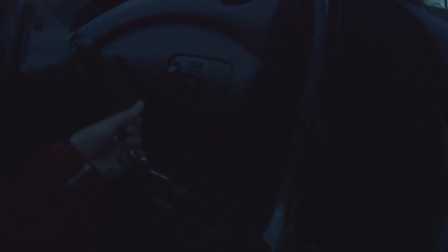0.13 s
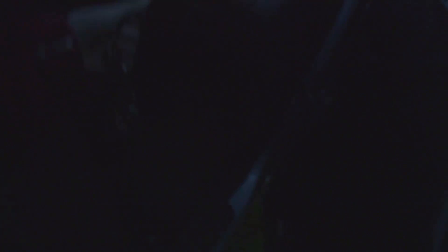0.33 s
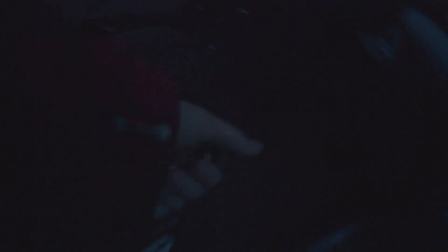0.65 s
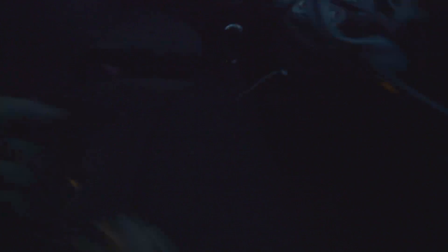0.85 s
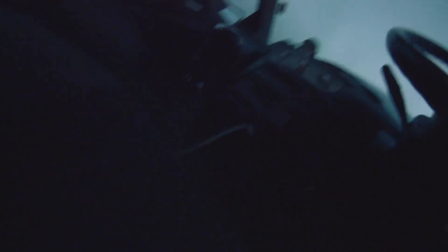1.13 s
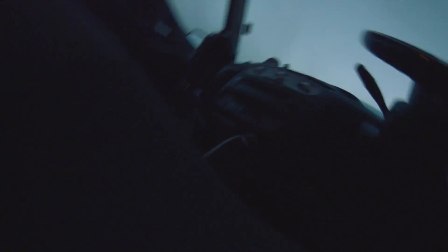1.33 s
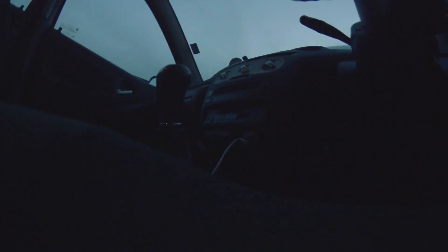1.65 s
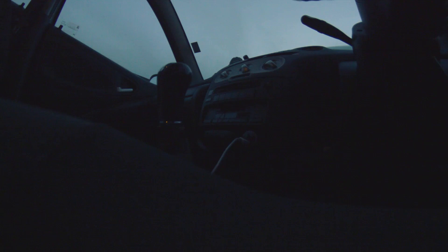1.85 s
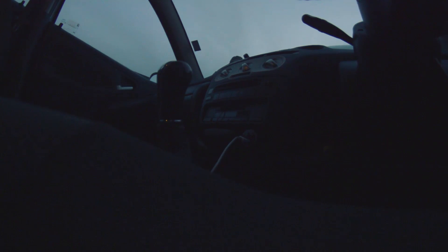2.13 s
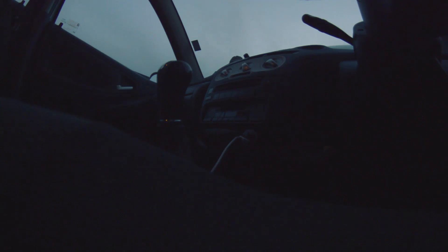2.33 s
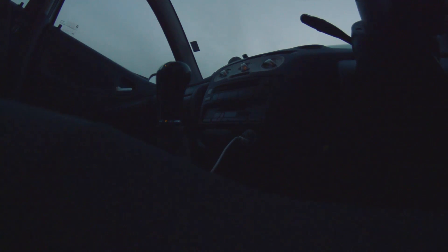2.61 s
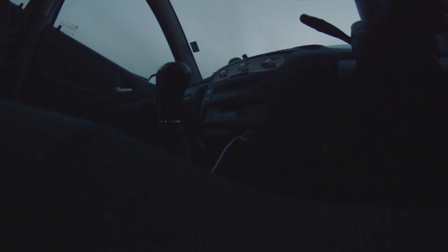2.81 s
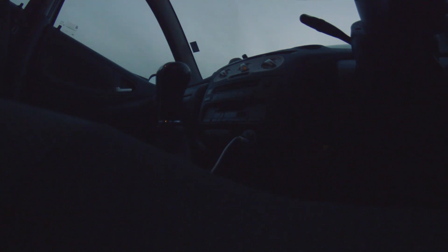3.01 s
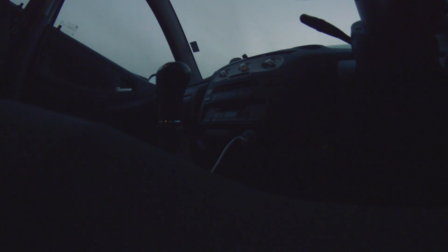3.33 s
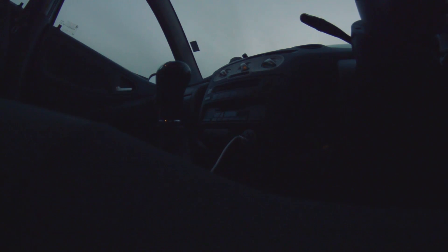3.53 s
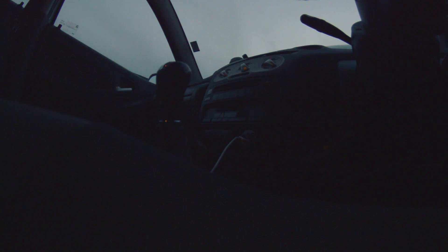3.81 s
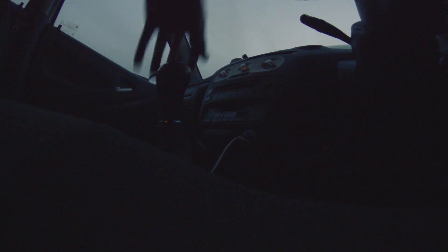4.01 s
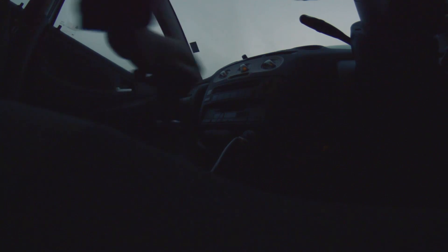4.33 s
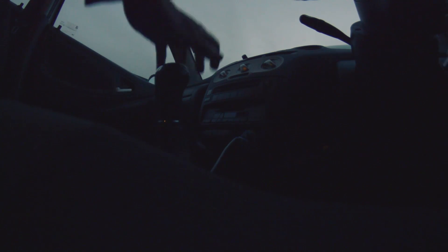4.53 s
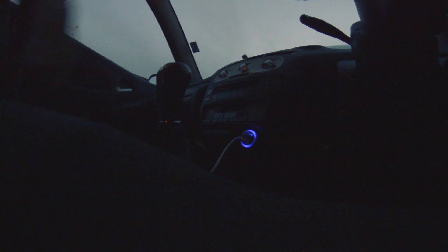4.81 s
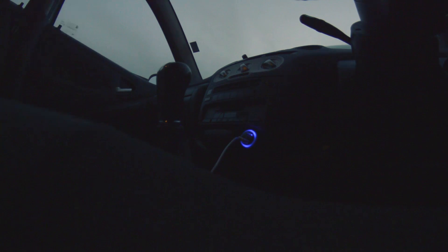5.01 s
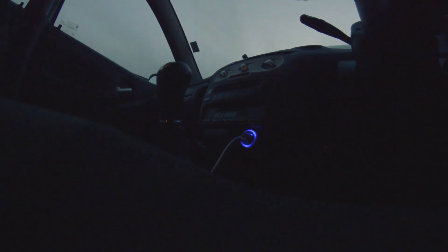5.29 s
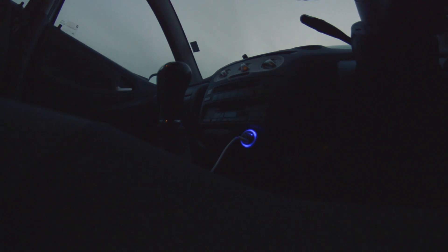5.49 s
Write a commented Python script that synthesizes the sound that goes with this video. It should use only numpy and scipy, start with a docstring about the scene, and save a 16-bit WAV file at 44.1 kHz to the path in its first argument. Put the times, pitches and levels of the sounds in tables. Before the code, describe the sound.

Close handheld camera in a dry, padded car interior, mono: low idling engine throb beneath, keys ticking and ringing in irregular bursts. Cloth rustles, then heavy low bumps and a hard tap as the camera is put down. After a quieter gap come plastic lock clacks with gritty scraping, a dull hand rub, more clacks, a brief motor buzz and two small latch drops amid clinks, then sparse fading jingles.

```python
"""Keys jangling in an idling car

A bunch of keys jangles at the ignition lock: each clink is a noisy tick plus ringing tones.
The lock clacks and scrapes as short noise, a hand rubs and bumps the camera, and a small actuator
buzzes with pulses until its latch drops twice. Engine beats and cabin noise run underneath.
The camera turns its gain down on loud sounds."""
import sys
import numpy as np
from scipy import signal
from scipy.fft import rfft, irfft, next_fast_len
from scipy.io import wavfile
from scipy.ndimage import map_coordinates

SR = 44100
rng = np.random.default_rng(int(sys.argv[2]) if len(sys.argv) > 2 else 0)


def file_out(sig):
    """Save sig as 16-bit WAV at sys.argv[1]."""
    # one column per channel
    cols = np.atleast_2d(sig).T
    # limit, then scale
    lim = np.clip(cols, -1, 1)
    pcm = np.round(lim * 32767).astype(np.int16)
    wavfile.write(sys.argv[1], SR, pcm)


N = 249606

# In the tables, tone colours and shares of modes are relative levels; t60 is the time to fall 60 dB.
# Engine speed: (time [s], engine cycles per second [Hz])
IDLE = [(0.0, 28.55), (0.66, 28.88), (5.66, 28.71)]
# Engine tones: (multiple of the cycle rate, relative level before random drift [dB])
ORDER = [(1, -23), (2, 1), (3, -33.5), (4, -8), (5, -6.5), (6, -51), (7, -8), (8, -14), (9, -28.5),
         (10, -34.5)]
# Colour of engine and fan noise in the cabin: (frequency [Hz], level per Hz [dB])
CABIN = [(12, -44), (38, -15), (60, 1.5), (204, -8), (285, -12.5), (624, -15), (802, -17), (1120, -20),
         (2080, -24), (3530, -36.5), (6180, -40), (16000, -50)]
# Cabin noise before it throbs: (time [s], level [dB])
CABIN_LEVEL = [(0, -20), (.85, -29), (2.3, -30), (3, -30.5), (4, -30.5), (5.66, -30.5)]
# Key on key: (time [s], tick level [dB], ring level before random changes [dB], kind of contact)
CLINKS = [(.069, -9.5, -22, "long"), (.088, -6, -21, "tag"), (0.0978, -7, -8.5, "bunch"),
          (0.109, -15, -5.5, "fob"), (0.194, -10.5, -32, "fob"), (0.2445, -8.5, -28, "long"),
          (0.327, -5, -0.5, "long"), (0.3568, 0.5, -40, "short"), (0.402, -13, -14, "pair"),
          (0.5902, -2.5, -7.5, "tag"), (0.624, -5, -36, "short"), (.6464, -8, -10, "short"),
          (.6824, -4, -18, "pair"), (.7176, -20, -20, "bunch"), (0.736, -10, -15.5, "fob"),
          (0.761, -9.5, -20, "fob"), (0.7733, -12, -4.5, "bunch"), (.7842, -5, -9.5, "fob"),
          (0.8015, -16, -12, "bunch"), (.851, -21, -21, "long"), (0.886, -10, -11, "short"),
          (0.94, -11, -21.5, "fob"), (1, -7, -32, "pair"), (1.0132, -2.5, -5, "pair"),
          (1.023, -25, -15, "fob"), (1.052, -12, -23, "fob"), (1.088, -11, -21.5, "short"),
          (1.12, -12.5, -19, "short"), (1.2011, -11, -26.5, "bunch"), (1.216, -11, -16, "short"),
          (1.257, -8, -38, "tag"), (1.2823, -12, -30, "short"), (1.374, -7.5, -39, "short"),
          (1.4545, -.5, -5, "pair"), (1.5424, -15, -19, "long"), (1.59, -7.5, -31, "pair"),
          (1.631, -12, -35, "pair"), (1.681, -18, -27.5, "long"), (1.803, -5.5, -16, "long"),
          (1.827, -29, -8, "long"), (1.8816, -9, -25, "tag"), (1.9372, -12, -11, "tag"),
          (1.9609, -1, -15.5, "long"), (2.0385, -9, -23, "fob"), (2.0577, -8, -10.5, "fob"),
          (2.107, -7, -22, "pair"), (2.136, -7, -8.5, "pair"), (2.195, -18, -13, "fob"),
          (2.259, -32, -30, "fob"), (2.3073, -6.5, -27, "fob"), (2.396, -13, -9, "tag"),
          (2.4653, -17, -21.5, "pair"), (2.489, -20, -21, "long"), (2.51, -13, -20, "pair"),
          (2.5893, -15, -44, "short"), (2.7066, -32, -37, "long"), (2.81, -24.5, -31.5, "pair"),
          (3.086, -23, -31, "pair"), (3.151, -8, -31, "short"), (3.3154, -18, -28, "pair"),
          (3.348, -11, -21, "fob"), (3.3788, -4, -17, "short"), (3.467, -18, -20.5, "fob"),
          (3.5969, -6, -10, "short"), (3.638, -17, -16, "short"), (3.721, -14, -23.5, "fob"),
          (3.7798, -10, -15, "long"), (3.7893, -13, -6.5, "pair"), (3.8147, -18, -16, "fob"),
          (3.8374, -18, -20.5, "long"), (3.901, -35, -25, "tag"), (3.9564, -13, -17, "pair"),
          (4.0083, -16, -15.5, "pair"), (4.054, -14, -21.5, "pair"), (4.2477, -23, -29.5, "pair"),
          (4.653, -21, -24, "bunch"), (4.7571, -36, -19, "long"), (4.8176, -7.5, -15.5, "bunch"),
          (4.8548, -2, -10.5, "bunch"), (4.916, -3, -9, "pair"), (4.9725, -2.5, -7, "bunch"),
          (5.013, -19, -27, "short"), (5.0717, -8.5, -23.5, "pair"), (5.1424, -13, -8.5, "short"),
          (5.1694, -28, -27, "pair"), (5.2045, -25, -23, "pair"), (5.243, -25, -25, "pair"),
          (5.3179, -21.5, -30, "short"), (5.451, -23, -55, "short"), (5.5197, -15.5, -19.5, "pair"),
          (5.5553, -25, -23.5, "pair"), (5.585, -24, -28, "pair"), (5.613, -26, -27, "long")]
# How each contact shares its ring: kind: (middle [dB], fob [dB], high [dB], top [dB])
CONTACT = {"long": (0, -20, -11, -21), "short": (-6.5, -22, 0, -19), "pair": (-0.5, -15, -3, -15),
           "fob": (-12.5, -1.5, -5.5, -14), "bunch": (-1.5, -5, -5.5, -9), "tag": (-3, -20, -2, -5)}
# Low modes of the long keys: name: (frequency [Hz], t60 when fully free [s])
LOW_RING = {"a": (3480, 0.18), "b": (4204, 0.33), "c": (4409, .4), "d": (5491, .2), "e": (6430, 0.048),
            "f": (6000, 0.1), "g": (7930, 0.073)}
# Five families of key modes, the last from split rings and tags:
# (frequency [Hz], relative level before scatter [dB], t60 when fully free [s])
MIDDLE_RING = [(8460, -12, .1), (8620, -14, .1), (8710, 0, .085), (8790, -9, .1)]
FOB_RING = [(9500, -14, .05), (10420, -10, .08), (10670, 0, .07), (10950, -7, .06)]
HIGH_RING = [(12560, 0, .06), (12890, -3, .06), (13620, -7, .065)]
TOP_RING = [(15055, 0, .13), (15270, 0, .1)]
SMALL_RING = [(5020, 0, .06), (5491, 0, .1), (6010, 0, .07), (6690, 0, .08), (7220, -2, .06),
              (7930, -2, .07)]
# A long key hangs free and rings low: (time [s], level before sway [dB], names of its low modes)
NOTES = [(0.095, -19.5, "bc"), (.81, -15, "e"), (0.828, -28.5, "b"), (1.02, -9, "e"), (1.258, -14.5, "e"),
         (1.281, -23, "e"), (1.458, -26, "bc"), (1.543, -29.5, "cb"), (1.802, -27.5, "cb"),
         (1.828, -20, "e"), (1.915, -23, "e"), (2.145, -28, "b"), (2.19, -25, "f"), (2.397, -23, "cb"),
         (3.18, -46, "c"), (3.64, -35, "c"), (3.781, -17, "cd"), (3.815, -18, "e"), (3.955, -39, "cb"),
         (4.054, -37, "c"), (4.862, -9.5, "e"), (4.916, -15, "g"), (4.917, -28.5, "ab"),
         (4.995, -28.5, "cb"), (5.143, -36.5, "c"), (5.243, -30, "e"), (5.263, -42, "cb"),
         (5.519, -29.5, "bc")]
# Colour of metal ticks: (frequency [Hz], level per Hz [dB])
TICK = [(1500, -1.5), (3000, -1.5), (5000, 2.5), (8500, 3.5), (12000, -3.5), (16000, -10)]
# How hard the bunch is stirred: (time [s], gain [dB])
RATTLE = [(0, -50), (.24, -38.5), (.45, -45), (.76, -26.5), (.88, -34), (1.5, -36), (1.81, -54.5),
          (1.88, -31.5), (2.02, -25), (2.57, -39.5), (2.81, -49.5), (3.1, -51), (3.72, -40), (4.03, -40),
          (4.59, -52.5), (4.73, -35.5), (4.98, -42), (5.28, -47.5), (5.66, -55)]
# Lock barrel: (time [s], body level [dB], treble level against the body [dB], t60 [s])
CLACKS = [(0.001, -7.5, -14, 0.058), (0.403, -8, 0.5, 0.023), (3.044, -10, -11, 0.042),
          (3.127, -18, -5, 0.037), (3.154, -15.5, -34, 0.052), (3.206, -17, -12, 0.055),
          (3.316, -19.5, -24, 0.063), (3.349, -9.5, -10, 0.063), (3.401, -1.5, 1.5, 0.018),
          (3.428, -12, -25, 0.022), (4.172, -24, -34, 0.06), (4.386, -13.5, -15, 0.025),
          (4.507, -5.5, -22, 0.042), (4.528, -15, -13, 0.067), (4.567, -5.5, 1, 0.033),
          (4.584, -18, 7, 0.047), (4.61, -18.5, 5, 0.034), (4.622, -13.5, 14.5, 0.038)]
# Colour of the steering-column plastic: (frequency [Hz], level per Hz [dB])
BARREL = [(120, -66), (200, -1), (670, 6.5), (1220, 0), (1530, -1), (2060, -5.5), (2380, -9), (2990, -10.5),
          (4030, -9), (4510, -12.5), (6000, -15.5), (7800, -21), (13200, -120)]
# Hollow notes of the column shroud: (frequency [Hz], width [Hz], relative level [dB])
COLUMN = [(713, 146, 0), (1454, 170, 2), (2320, 300, -2.5)]
# Key blade over the tumblers: (peak time [s], peak before judder and mixing [dB], t60 [s])
SCRAPE = [(3.13, -30, 0.24), (3.33, -18, 0.56), (4.6, -24.5, 0.22)]
# Soft bumps on the camera body: (time [s], level [dB], swing frequency [Hz])
BUMPS = [(0.822, -2.5, 228), (.901, 0, 253), (.959, 1.5, 192), (1.302, 3.5, 73), (1.335, 4, 37.4),
         (1.365, 8.5, 97), (1.385, 13.5, 55), (1.413, 24.5, 94.5), (1.455, 16.5, 83.5), (1.586, 14.5, 63.3),
         (1.626, 9.5, 83.4), (2.024, -1.5, 213), (2.049, 2.5, 221), (2.518, 1.5, 194), (2.535, 5.5, 39),
         (2.595, 9, 48.6), (4.304, 8, 240), (4.327, 7, 124), (4.374, 3, 65)]
# The camera meets the seat frame: (time [s], level [dB])
TAPS = [(1.7456, 2), (1.754, 9)]
# Palm strokes over the trim: (peak time [s], peak level before flutter [dB])
RUB = [(4.18, -12.5), (4.215, -22.5), (4.275, -28.5), (4.316, -11.5), (4.39, -19), (4.42, -23)]
# Colour of the palm: (frequency [Hz], level per Hz [dB])
PALM = [(35, -28), (60, -10), (85, -9), (123, -6.5), (185, -11), (330, -4.5), (445, -11), (4000, -41.5),
        (5200, -44), (8800, -120)]
# Cloth rustling as the camera is carried: (time [s], level before flutter [dB])
SLEEVE = [(0.0, -25.5), (0.6, -30), (0.85, -42)]
# Colour of the cloth: (frequency [Hz], level per Hz [dB])
CLOTH = [(150, -38), (250, -25), (429, -24), (480, -1.5), (605, -6), (1010, -9.5), (3500, -28.5),
         (4550, -41), (7700, -120)]
# Actuator housing, passed twice: (frequency [Hz], width for one pass [Hz], level for one pass [dB])
HOUSING = [(540, 250, -0.5), (1470, 310, -3), (2280, 180, 1), (2850, 310, -2.5)]
# Latch drops: (time [s], level [dB])
LATCH = [(4.972, -19), (5.075, -24)]
# Latch modes: (frequency [Hz], relative level before scatter [dB], t60 [s])
LATCH_RING = [(496, -1, 0.14), (1036, -4.5, .05), (2050, -2, 0.069), (2660, -13, .04)]

SECOND_FIRING = 0.413  # share of the cycle at which the second exhaust beat comes
BEATS_DB = -22.5  # level of the exhaust beats
SECOND_MODE_DB = -3  # second named low mode against the first, before scatter
SMALL_DB = -18  # small rings against the ring of each clink
SCRAPE_RISE_S = 0.048
BUMP_T60_S, BUMP_CYCLES = 0.04, 2.2  # decay: a fixed part plus some cycles of the swing
PUFF_DB = -32.5  # rustle of the grip against each bump
RUB_RISE_S, RUB_T60_S = 0.15, 0.18
SCUFF_S, SCUFF_DB = 1.083, -21.5  # a short squeaky scuff
SCUFF_HZ, SCUFF_WIDTH_HZ = 1350, 500  # its resonance, passed twice; width is for one pass
BUZZ_PEAK_S, BUZZ_DB = 4.88, -27.5  # actuator
BUZZ_RISE_S, BUZZ_HOLD_S, BUZZ_T60_S = 0.42, 0.035, 0.1
BUZZ_HZ, BUZZ_SAG_HZ_PER_S = 182, 35  # speed at the peak, and its fall under load
TOP_HZ = 15900  # upper band limit


def amp(db):
    """Turns decibels into a plain gain."""
    return 10 ** (np.asarray(db) / 20)


def unit(x):
    """Scales a sound to an RMS (average strength) of one."""
    return x / np.sqrt(np.mean(x ** 2) + 1e-20)


def curves(rows, outside=None):
    """One value per sample for each column after the time."""
    s, *columns = np.transpose(rows)
    return [np.interp(np.arange(N) / SR, s, column, outside, outside) for column in columns]


def wobble(rate):
    """A smooth random curve through rate random points a second."""
    points = rng.standard_normal(int(N * rate / SR) + 4)
    return map_coordinates(points, [np.arange(N) * rate / SR])


def swell(peak_s, db, rise_s, t60, hold_s=0):
    """Gain that climbs 60 dB in rise_s, holds, then falls 60 dB in t60."""
    t = np.arange(N) / SR - peak_s
    climb_db = 60 * np.minimum(t, 0) / rise_s
    fall_db = 60 * np.maximum(t - hold_s, 0) / t60
    return amp(db + climb_db - fall_db)


def filtered(x, response):
    """Multiplies the spectrum of x by a response to frequency."""
    m = next_fast_len(N + SR // 2)
    return irfft(rfft(x, m) * response(np.fft.rfftfreq(m, 1 / SR)), m)[:N]


def colour(points):
    """Gain drawn through (frequency [Hz], level [dB]) points on a log axis."""
    f, db = np.transpose(points)
    return lambda hz: amp(np.interp(np.log(hz + 1), np.log(f + 1), db))


def resonant(peaks):
    """Response of hollow bodies that favour the notes (frequency [Hz], width [Hz], level [dB])."""
    def response(f):
        total = 0
        for k, (centre, width, db) in enumerate(peaks):
            peak = 1j * f * width / (centre * centre - f * f + 1j * f * width)
            total = total + (-1) ** k * amp(db) * peak  # signs alternate
        return total
    return response


def noise(response):
    """Random hiss shaped by a response, at an RMS of one."""
    return unit(filtered(rng.standard_normal(N), response))


def add(track, s, sound):
    """Mixes a sound in at s seconds."""
    part = track[round(s * SR):][:len(sound)]
    part += sound[:len(part)]


def ring(modes, t, freedom, scatter_db, detune=0):
    """Fading tones share fixed energy at random; freedom scales their decay, detune shifts them."""
    hz, db, t60 = np.transpose(modes)[:, :, None]
    share, shift = rng.standard_normal((2, len(modes), 1))
    size = amp(db + scatter_db * share)
    fade = amp(-60 * t / (t60 * freedom))
    tones = np.sin(2 * np.pi * hz * (1 + detune * shift) * t)
    return np.sum(size / np.linalg.norm(size) * fade * tones, axis=0)


def engine():
    """Two unevenly spaced exhaust beats a cycle, over rough cabin noise that throbs with them."""
    turn = 2 * np.pi * (np.cumsum(curves(IDLE)[0]) / SR + 0.3164)
    beats = np.zeros(N)
    for k, db in ORDER:
        pair_phase = np.angle(1 + np.exp(-2j * np.pi * k * SECOND_FIRING))
        strength = amp(db + 1.26 * wobble(5.1))
        beats -= strength * np.cos(k * turn + pair_phase + 0.2 * wobble(4.0))
    beats = unit(beats)
    throb_db = -1.5 * beats + 0.22 * wobble(16.0)
    cabin_noise = amp(curves(CABIN_LEVEL)[0] + throb_db) * noise(colour(CABIN))
    return amp(BEATS_DB) * beats + cabin_noise


def cabin(x):
    """The short, padded echo of the car interior, made of quickly fading random reflections."""
    t = np.arange(SR // 5) / SR
    tail = rng.standard_normal(len(t)) * amp(-60 * t / 0.021) * (t > 0.002)
    return signal.fftconvolve(x, tail / np.linalg.norm(tail))[:N]


def handling():
    """Bumps swing the camera, hard taps give a pressure spike and a wobble, sleeve and palm rub."""
    out, t, grip = np.zeros(N), np.arange(SR // 3) / SR, noise(colour(CLOTH))
    for s, db, hz in BUMPS:
        fall = amp(db - 60 * t / (BUMP_T60_S + BUMP_CYCLES / hz))
        swing = np.sin(2 * np.pi * hz * t)
        puff = amp(PUFF_DB) * grip[round(s * SR):][:len(t)]
        add(out, s, fall * (1 - np.exp(-t / 0.017)) * (swing + puff))
    squeak = noise(lambda f: resonant([(SCUFF_HZ, SCUFF_WIDTH_HZ, 0)])(f) ** 2)
    out += swell(SCUFF_S, SCUFF_DB, 0.04, 0.043) * squeak
    for s, db in TAPS:
        spike = -(t / 0.00044) * np.exp(1 - t / 0.00047)
        shake = amp(-1.5 - 60 * t / 0.051) * np.sin(2 * np.pi * 120 * t)
        add(out, s, amp(db) * (spike + shake))
    # Silent outside the sleeve table's times
    out += amp(curves(SLEEVE, -120)[0] + 1.1 * wobble(44.4)) * noise(colour(CLOTH))
    strokes = sum(swell(s, db, RUB_RISE_S, RUB_T60_S) for s, db in RUB)
    flutter = unit(amp(3.25 * wobble(60) + 3.5 * wobble(220)))
    return out + strokes * flutter * noise(colour(PALM))


def actuator():
    """An uneven pulse on every turn rings the housing, and the latch drops twice."""
    from_peak = np.clip(np.arange(N) / SR - BUZZ_PEAK_S, -0.2, 0.2)
    hz = BUZZ_HZ - BUZZ_SAG_HZ_PER_S * from_peak
    turns = np.floor(np.cumsum(hz) / SR)
    pulses = np.diff(turns, prepend=0) * amp(2.0 * rng.standard_normal(N))
    running = swell(BUZZ_PEAK_S, BUZZ_DB, BUZZ_RISE_S, BUZZ_T60_S, BUZZ_HOLD_S)
    out = running * unit(filtered(pulses, lambda f: resonant(HOUSING)(f) ** 2))
    t = np.arange(SR // 5) / SR
    for s, db in LATCH:
        add(out, s, amp(db) * ring(LATCH_RING, t, 1, scatter_db=-1.0))
    return out


def lock():
    """Clacks and scrapes of the key blade sound through the column plastic, with a bright edge."""
    body, edge, t = np.zeros(N), np.zeros(N), np.arange(SR // 4) / SR
    for s, db, treble_db, t60 in CLACKS:
        fall = amp(db - 60 * t / np.clip(t60, 0.01, 0.2)) * (1 - np.exp(-t / 0.00036))
        add(body, s, fall)
        add(edge, s, amp(treble_db) * fall)
    stroke = sum(swell(s, db, SCRAPE_RISE_S, t60) for s, db, t60 in SCRAPE)
    stroke = stroke * amp(5.9 * wobble(160))  # the blade judders
    plastic = noise(colour(BARREL)) + amp(-2.0) * noise(resonant(COLUMN))
    bright = (edge + amp(-9.0) * stroke) * noise(colour(TICK))
    return (body + amp(-3.0) * stroke) * plastic + bright


def rattle():
    """Clumps of faint touches tick and ring keys, rings and tags, over a fluttering slide noise."""
    sizes = amp(2.0 * rng.exponential(size=N)) * rng.standard_normal(N)
    touches = sizes * (rng.random(N) < 260 * np.exp(0.6 * wobble(30)) / SR)
    t = np.arange(SR // 8) / SR

    def sounding(modes, share):
        """Each touch reaches only a random share of the modes."""
        total = np.zeros(N)
        for mode in modes:
            struck = touches * rng.standard_normal(N) * (rng.random(N) < share)
            total += signal.fftconvolve(struck, ring([mode], t, 0.44, scatter_db=0))[:N]
        return unit(total)

    key_modes = MIDDLE_RING[2:] + FOB_RING[1:] + HIGH_RING + TOP_RING
    chime = sounding([(hz, 0, 0.5 * t60) for hz, db, t60 in key_modes], 0.22)
    small_hz = np.linspace(4800, 14500, num=24) + rng.normal(0, 280, size=24)
    small = sounding([(hz, 0, 0.045) for hz in small_hz], 0.094)
    ticks = signal.fftconvolve(np.abs(touches), amp(-60 * t / 0.016))[:N] * noise(colour(TICK))
    slide = amp(3 * wobble(90)) * noise(colour(TICK))
    mix = amp(-13.0) * chime + amp(-2.5) * small + amp(-3) * unit(ticks) + amp(-5) * unit(slide)
    return amp(curves(RATTLE)[0]) * mix


def keys():
    """Clinks tick and ring key and small-ring modes until the next contact; long keys ring low."""
    out, burst, t = np.zeros(N), np.zeros(N), np.arange(SR // 2) / SR
    rise = 1 - np.exp(-t / 0.00053)
    brushing = wobble(110)  # the keys keep brushing each other, so each ring comes in fits
    families = (MIDDLE_RING, FOB_RING, HIGH_RING, TOP_RING, SMALL_RING)
    gaps = np.diff([row[0] for row in CLINKS], append=N / SR + 1)
    for (s, tick_db, ring_db, kind), gap in zip(CLINKS, gaps):
        freedom = np.exp(0.28 * rng.standard_normal())
        shape = rise * amp(-60 * np.maximum(t - gap, 0) / 0.013)  # the next contact stills it
        snap = amp(-14 - 60 * t / 0.011)
        tail = rise * amp(-20.5 - 60 * t / 0.096)
        add(burst, s, amp(tick_db) * (snap + tail))
        for modes, db in zip(families, (*CONTACT[kind], SMALL_DB)):
            brush_db = 4 * np.resize(np.roll(brushing, -rng.integers(N)), len(t))
            tones = ring(modes, t, freedom, scatter_db=5.0, detune=0.0023)
            add(out, s, amp(ring_db + db + brush_db) * shape * tones)
    sway = amp(3.4 * wobble(45))  # a swinging key turns towards and away from the microphone
    for s, db, names in NOTES:
        modes = []
        for k, name in enumerate(names):
            hz, t60 = LOW_RING[name]
            modes.append((hz, SECOND_MODE_DB * k, t60))
        turning = np.resize(sway[round(s * SR):], len(t))
        add(out, s, amp(db) * rise * turning * ring(modes, t, 0.87, scatter_db=3))
    return out + burst * amp(3.3 * wobble(400)) * noise(colour(TICK))


def scene():
    """Adds all sources; the keys and the lock also get the cabin echo."""
    metal = keys() + lock()
    mono = engine() + handling() + actuator() + rattle() + metal + amp(-6) * cabin(metal)
    return np.array([mono, mono])


def record(dry):
    """Gain ducks fast on loud sound and recovers steadily; then soft clipping and a band limit."""
    t = np.arange(N) / SR
    smoothing = np.exp(-1 / (0.002 * SR))
    power = signal.lfilter([1], [1, -smoothing], dry[0] ** 2) / (0.0045 * SR)
    # The held level jumps up with each peak, then falls 38 dB a second
    recovery_db = 38 * t
    held_db = np.maximum.accumulate(10 * np.log10(power + 1e-12) + recovery_db) - recovery_db
    x = dry[0] * amp(-0.7 * np.maximum(held_db + 14.5, 0))
    x = x / (1 + np.abs(x / 1.05) ** 8) ** (1 / 8)
    x = filtered(x, lambda hz: 1 / (1 + (hz / TOP_HZ) ** 90) * (hz < 17100))
    return np.array([x, x])


dry = scene()
out = record(dry)
file_out(out)
```